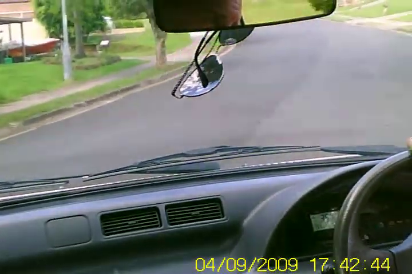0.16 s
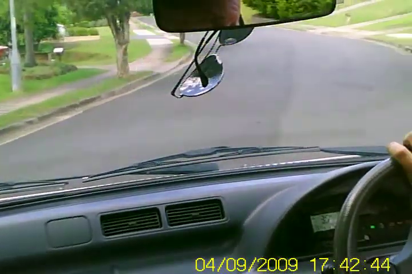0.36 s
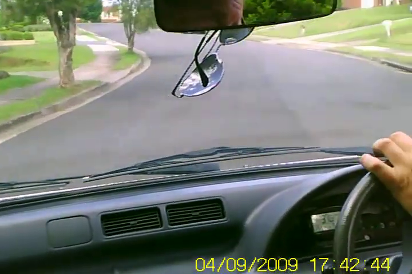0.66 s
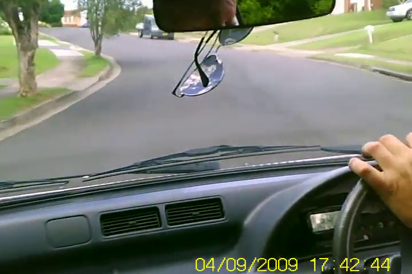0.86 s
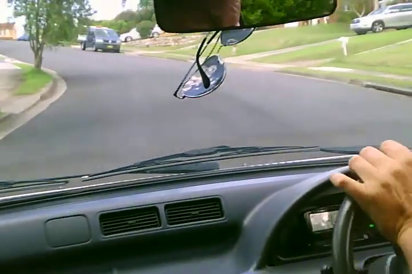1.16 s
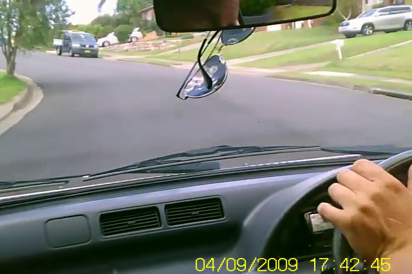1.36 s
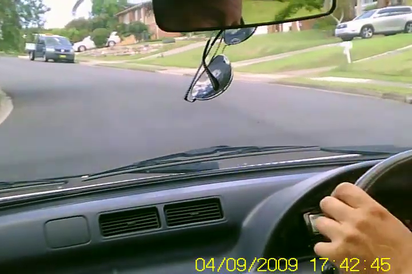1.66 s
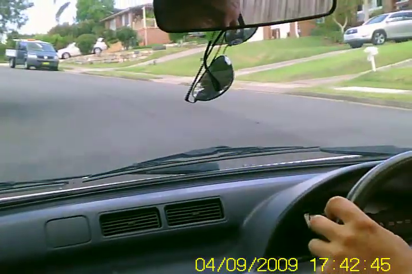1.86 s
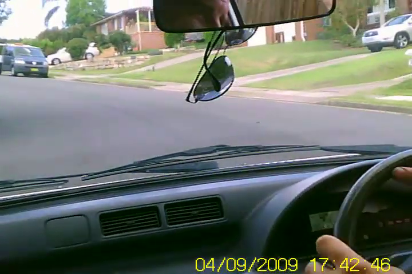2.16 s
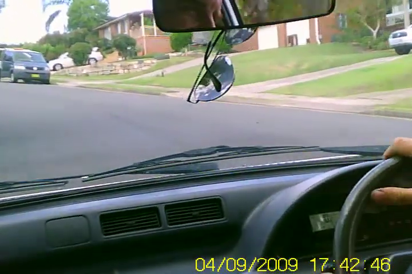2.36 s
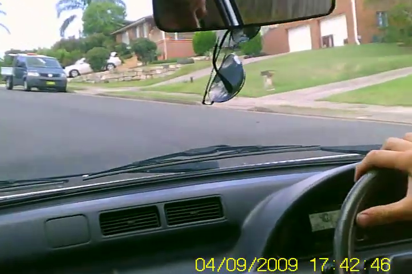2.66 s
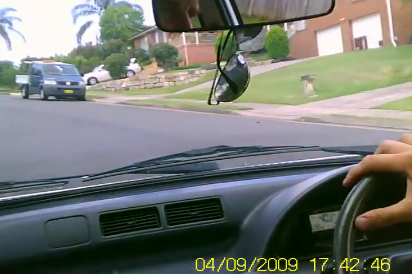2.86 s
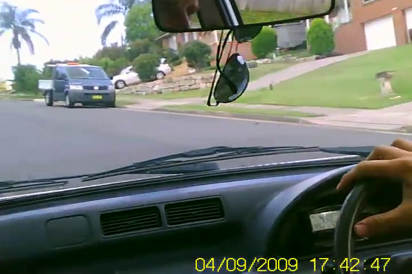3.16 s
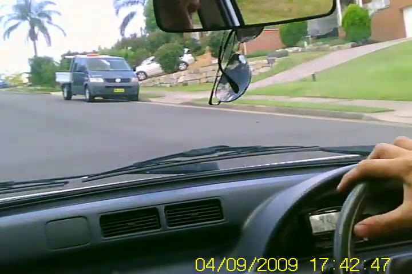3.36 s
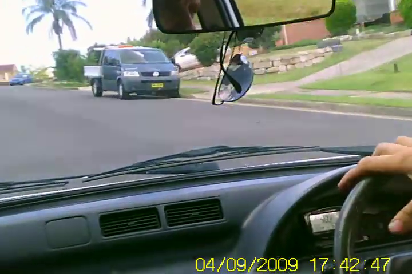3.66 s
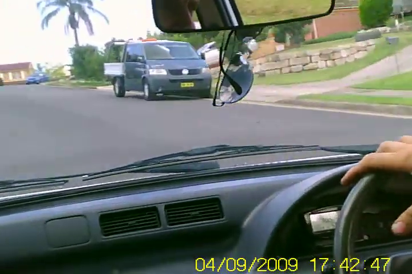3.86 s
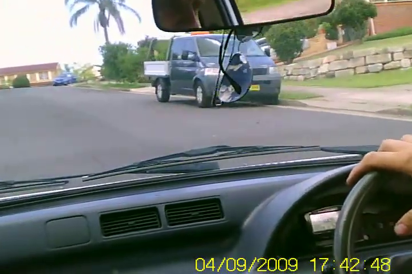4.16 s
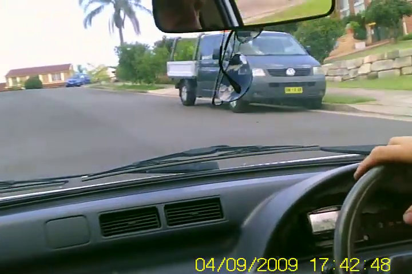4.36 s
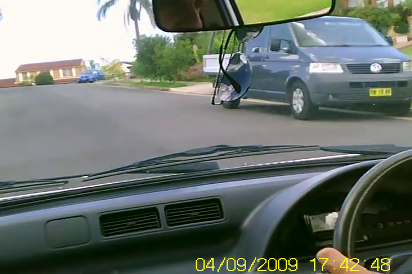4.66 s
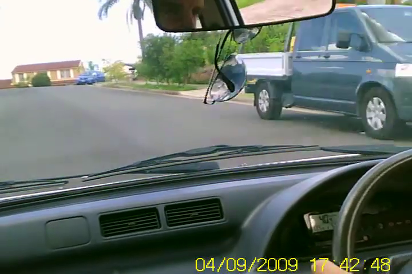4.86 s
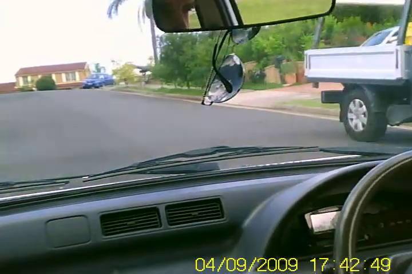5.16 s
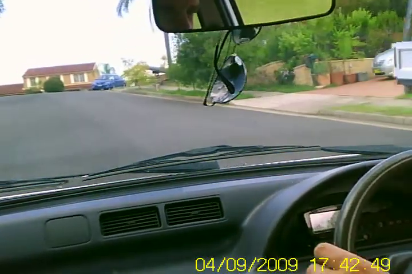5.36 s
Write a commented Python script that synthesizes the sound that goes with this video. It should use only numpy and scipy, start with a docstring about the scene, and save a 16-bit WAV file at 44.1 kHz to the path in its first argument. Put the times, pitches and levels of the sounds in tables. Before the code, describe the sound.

A small electric car's high motor whine over low road rumble, heard inside, with two soft thumps and one sharp click.

```python
"""Inside a small electric car rolling along a suburban street.
The motor whines near 1.2 kHz, modulated by the swaying driveline, and its brushes excite treble
resonances of the housing. The road forces the body, cabin air and panels into vibration over a faint
electronic hiss. A hand slides on the steering wheel, and the wheels thump over two seams.
Just after the first seam comes a sharp click, and the road noise and housing ring drop in level."""
import sys
import numpy as np
from scipy import signal
from scipy.fft import rfft, irfft
from scipy.io import wavfile
from scipy.ndimage import uniform_filter1d

SR = 44100
rng = np.random.default_rng(int(sys.argv[2]) if len(sys.argv) > 2 else 0)


def generate_wav(sig):
    """Save sig (samples, or channels by samples) to the path in sys.argv[1] as 16-bit PCM at SR."""
    pcm = np.round(np.clip(np.atleast_2d(sig).T, -1, 1) * 32767).astype(np.int16)
    wavfile.write(sys.argv[1], SR, pcm)


N = 242550
TIME = np.arange(N) / SR


def from_db(db):
    """Amplitude ratio: tenfold for every 20 dB."""
    return 10 ** (np.asarray(db) / 20)


def rms_one(x):
    """Normalisation to unit power."""
    return x / np.sqrt(np.mean(np.abs(x) ** 2) + 1e-20)


def in_time(curve):
    """Linear interpolation of (time, value) rows at every sample."""
    return np.interp(TIME, *np.transpose(curve))


def resonate(x, hz, width_hz):
    """Two equal resonators in cascade, scaled so that white noise keeps its power."""
    r = np.exp(-np.pi * width_hz / SR)
    section = [1 - r, 0, r - 1, 1, -2 * r * np.cos(2 * np.pi * hz / SR), r * r]
    return signal.sosfilt([section, section], x) * np.sqrt(2 * SR / (np.pi * width_hz))


def resonant_noise(hz, width_hz):
    """Steady-state response of a resonator to white noise; rms 1."""
    return rms_one(resonate(rng.standard_normal(N + SR // 2), hz, width_hz)[-N:])


def shaken(modes):
    """Superposition of randomly driven modes; rms 1."""
    return rms_one(sum(from_db(db) * resonant_noise(hz, width) for hz, width, db in modes))


def steadied(x, span_s):
    """Division by the running rms evens out slow swells and keeps fast ones."""
    return x / np.sqrt(uniform_filter1d(x * x, int(span_s * SR)) + 1e-6)


def coloured(spectrum):
    """Spectral shaping of white noise; rms 1."""
    hz, db = np.transpose(spectrum)
    bin_hz = np.arange(N // 2 + 1) * SR / N
    shape_db = np.interp(np.log(bin_hz + 1), np.log(hz), db)
    return rms_one(irfft(rfft(rng.standard_normal(N)) * from_db(shape_db), N))


def flutter(rate_hz, hop=50, run_in=1000):
    """Random modulation of amplitude and phase by complex low-pass noise; rms 1."""
    low_pass = signal.butter(2, rate_hz, fs=SR / hop, output="sos")
    noise = rng.standard_normal((2, N // hop + run_in + 2))
    real, imag = signal.sosfilt(low_pass, noise)[:, run_in:]
    return rms_one(np.interp(np.arange(N) / hop, np.arange(len(real)), real + 1j * imag))


def tone(phase, envelope=1):
    """A sinusoidal carrier of rms 1, modulated by a complex envelope."""
    return np.sqrt(2) * np.real(envelope * np.exp(1j * phase))


def partials(phase, orders):
    """Rotational orders: fluttering tones at fixed multiples of one frequency."""
    return sum(from_db(db) * tone(ratio * phase, flutter(rate_hz)) for ratio, db, rate_hz in orders)


def driveline_jolt(strength=.7, rise_s=.06, decay_s=.3):
    """Transient response: the driveline's swing builds and dies away after each seam."""
    ages = [np.maximum(TIME - start_s, 0) for start_s, _ in SEAMS]
    return strength * sum((1 - np.exp(-age / rise_s)) * np.exp(-age / decay_s) for age in ages)


# Motor load, heard as the strength of the whine: time_s, level_db
MOTOR_LOAD = [(0, -50), (.35, -51), (.55, -58), (.68, -54), (.9, -54.5), (.96, -64), (1.06, -58),
              (1.5, -52), (1.75, -53.5), (2.3, -56), (2.8, -52.5), (3.3, -50.5), (3.65, -51), (4.15, -48.5),
              (4.39, -48), (4.46, -58), (4.75, -53.5), (5.5, -52.5)]

def whine(pitch_hz, phase, taut_db=-47.5, sway_per_db=.06, upper_s_per_hz=.0031, trim_db=-.5):
    """Modulation makes side bands: the driveline sways under light load and after a jolt."""
    load_db = in_time(MOTOR_LOAD)
    jolt = driveline_jolt()
    sway_share = np.clip(sway_per_db * (taut_db - load_db) + jolt, 0, 1)
    sway = (resonant_noise(hz=13, width_hz=12) + 1j * resonant_noise(hz=13, width_hz=12)) / np.sqrt(2)
    main = tone(phase, np.sqrt(1 - sway_share) + np.sqrt(sway_share) * sway)
    # Speeding up or a jolt adds a once-a-turn wobble, moving power into the next shaft order up.
    climb_hz_per_s = np.maximum(np.gradient(pitch_hz, TIME), 0)
    upper_share = np.clip(upper_s_per_hz * climb_hz_per_s + .4 * jolt, 0, 1)
    shaft_phase = phase / 42
    upper = tone(phase + shaft_phase, flutter(rate_hz=12))
    both = np.sqrt(1 - upper_share) * main + np.sqrt(upper_share) * upper
    # The level wavers, more deeply near top speed.
    depth_db = np.interp(pitch_hz, [1208, 1222], [1.2, 3.2])
    waver = np.sqrt(2) * np.tanh(resonant_noise(hz=7.8, width_hz=5))
    return from_db(load_db + trim_db + depth_db * waver) * steadied(both, span_s=.1)


def hum(pitch_hz, phase, level_db=-56, panel_hz=566, width_hz=27.8):
    """A subharmonic, an octave under the whine, swells as it passes a panel resonance."""
    response = 1 / np.hypot(1, 2 * (pitch_hz / 2 - panel_hz) / width_hz)
    return from_db(level_db) * response * tone(phase / 2, 1 + .32 * flutter(rate_hz=3.8))


# Low orders of the motor shaft: whine_ratio, level_db, flutter_hz
SHAFT_ORDERS = [(5 / 21, -62, 4.4), (6 / 21, -68.5, 4.4), (7 / 21, -62, 5.8), (8 / 21, -59.5, 3),
                (9 / 21, -63, 4.4), (2, -80.5, 6.7)]

def growl(phase):
    """Forced vibration at multiples of the shaft's rotation rate."""
    return partials(phase, SHAFT_ORDERS)


# Strength of the brush noise: time_s, level_db
BRUSH_LEVEL = [(0, -72), (.9, -79), (1.25, -78.5), (1.55, -74.5), (1.85, -77), (2.85, -67), (3.4, -69.5),
               (4.3, -72.5), (5.5, -70.5)]
# Overtones of the brushes: whine_ratio, gain_db, flutter_hz
BRUSH_OVERTONES = [(125 / 42, 0.91, 12), (3, 3.4, 12), (3.3, 0, 25), (4, 6.2, 35), (173 / 42, -3, 46),
                   (182 / 42, -7.5, 25), (195 / 42, -5, 30)]
# Modes of the motor housing: centre_hz, width_hz, gain_db
HOUSING_MODES = [(3598, 130, -7), (4100, 99, -10), (4932, 270, -2.5), (5053, 87, 0), (5310, 400, -3.5),
                 (5580, 150, -7), (6030, 460, -13.5)]

def brushes(phase, overtone_trim_db=-1, ring_db=-70.5, ring_follows=.4):
    """Resonance: brush noise rings the housing, and each overtone sings as it crosses a mode."""
    overtones = partials(phase, BRUSH_OVERTONES)
    singing = rms_one(sum(from_db(db) * resonate(overtones, hz, width) for hz, width, db in HOUSING_MODES))
    brush_db = in_time(BRUSH_LEVEL)
    swing_db = ring_follows * (brush_db - brush_db.mean())
    ring = from_db(ring_db + swing_db) * early_boost() * shaken(HOUSING_MODES)
    return ring + from_db(brush_db + overtone_trim_db) * singing


# Motor speed, heard as the pitch of the whine: time_s, pitch_hz
MOTOR_SPEED = [(0, 1105), (.5, 1152), (.7, 1178), (1, 1189), (2.35, 1227), (3, 1221), (3.5, 1213),
               (4.38, 1206), (4.52, 1168), (4.9, 1168), (5.5, 1143)]

def motor():
    """One rotation drives every motor tone; phase is the integral of frequency."""
    pitch_hz = in_time(MOTOR_SPEED)
    phase = 2 * np.pi * np.cumsum(pitch_hz) / SR
    return hum(pitch_hz, phase) + growl(phase) + brushes(phase) + whine(pitch_hz, phase)


# Unevenness of the road, felt as body shake: time_s, level_db
UNEVENNESS = [(0, -21.5), (.5, -18), (.7, -20.5), (.87, -14), (1.02, -25), (1.45, -26.5), (1.8, -32),
              (2.1, -21.5), (2.42, -31), (2.9, -23), (3.08, -21), (3.5, -24.5), (4.3, -24), (4.6, -19.5),
              (5, -23.5), (5.5, -24.5)]
# Spectrum of the sprung body's rocking: frequency_hz, relative_density_db
BODY_SPECTRUM = [(6, -25), (12, -14), (17, -2), (22, 0.5), (27, 2), (33, -7.5), (48, -9.5), (55, -19),
                 (64, -25.5), (90, -100)]

def body_rumble(trim_db=-1.43):
    """Base excitation: the uneven road rocks the body on its springs."""
    return from_db(in_time(UNEVENNESS) + trim_db) * steadied(coloured(BODY_SPECTRUM), span_s=.161)


# Coarseness of the asphalt: time_s, gain_db
COARSENESS = [(0, -0.5), (.6, -0.5), (.8, 1), (1, -2), (1.88, -1.5), (2.1, -0.6), (2.4, -1), (2.9, 1.4),
              (3.5, 1), (4.4, 1.5), (5, 0), (5.5, 0)]
# Modes of the cabin air: centre_hz, width_hz, gain_db
CABIN_MODES = [(74.2, 15.7, 1.5), (102.4, 17, -2), (129.2, 34.7, 3), (159.7, 56, -4), (227.7, 50, -6.5)]
# Modes of the panels: centre_hz, width_hz, gain_db
PANEL_MODES = [(313.7, 72, -1.5), (337, 44, -8.5), (411.5, 42, 3), (469.7, 68, -3.5), (522.7, 51, 0.5),
               (576, 160, -4.5)]
# Tyre noise through the glass: frequency_hz, relative_density_db
TYRE_SPECTRUM = [(200, 7), (600, 2.5), (705, -1), (760, 7), (810, 5.5), (930, 6.5), (1020, 9), (1130, 2.5),
                 (1290, 1), (1650, -1.5), (1950, 0.5), (2500, -6.5), (3200, -13), (7000, -23.5)]

def road_noise(cabin_db=-42, panel_db=-52, tyre_db=-54.5, cabin_follows=1.38):
    """Random excitation: rough asphalt drives cabin air and panel modes while the tread hisses."""
    coarse_db = in_time(COARSENESS)
    drone = from_db(cabin_db + cabin_follows * coarse_db) * steadied(shaken(CABIN_MODES), span_s=.2)
    roar = from_db(panel_db + coarse_db) * steadied(shaken(PANEL_MODES), span_s=.23)
    tread = from_db(tyre_db + coarse_db) * coloured(TYRE_SPECTRUM)
    return early_boost() * (drone + roar + tread)


# Electronic hiss: frequency_hz, relative_density_db
HISS_SPECTRUM = [(1000, 5.5), (6000, 4.5), (9600, 2.5), (11400, -4)]
# Steady tones of the electronics: pitch_hz, level_db
ELECTRONIC_TONES = [(3894, -85.5), (5600, -84.5), (6200, -94), (7400, -85), (9600, -87)]

def electronics(hiss_db=-72):
    """A line spectrum of thin tones over a continuous spectrum of hiss."""
    tones = sum(from_db(db) * tone(2 * np.pi * hz * TIME) for hz, db in ELECTRONIC_TONES)
    return from_db(hiss_db) * coloured(HISS_SPECTRUM) + tones


# Strokes of a hand on the wheel and trim: start_s, length_s, level_db, centre_hz, width_hz
HAND_STROKES = [(0.412, .05, -59, 3000, 2200), (0.535, 0.04, -54, 1870, 500),
                (1.135, 0.02, -68, 3500, 5000), (1.135, 0.02, -65, 6160, 1200),
                (1.137, 0.12, -54.5, 1290, 1500), (1.16, 0.023, -63, 3600, 3800),
                (1.161, 0.049, -65, 6030, 895), (1.163, 0.071, -59.5, 2610, 1580),
                (1.387, 0.043, -66, 1980, 600), (4.41, 0.03, -56.5, 2180, 500)]

def hand_rubs():
    """Sliding friction: each stroke is a band of noise that swells quickly and fades."""
    out = np.zeros(N)
    for start_s, length_s, db, hz, width_hz in HAND_STROKES:
        progress = np.clip((TIME - start_s) / length_s, 0, 1)
        out += from_db(db) * np.sin(np.pi * np.sqrt(progress)) * resonant_noise(hz, width_hz)
    return out


# Wheels striking road seams: start_s, level_db
SEAMS = [(0.734, -24), (4.396, -23.5)]
# Modes of the suspension: pitch_hz, gain_db, t60_s
SUSPENSION_MODES = [(139, 3.5, 0.089), (185, -36, 0.025), (243, 1.5, 0.016), (325, -19, 0.019)]

def seam_thumps(tyre_cutoff_hz=420):
    """Damped free vibration: each seam kicks the suspension, and the soft tyre low-passes the blow."""
    out = np.zeros(N)
    for start_s, level_db in SEAMS:
        age = np.maximum(TIME - start_s, 0)
        for hz, gain_db, t60_s in SUSPENSION_MODES:
            decay_db = 60 * np.minimum(age / t60_s, 3)
            out -= from_db(level_db + gain_db - decay_db) * np.sin(2 * np.pi * hz * age)
    return signal.sosfilt(signal.butter(2, tyre_cutoff_hz, fs=SR, output="sos"), out)


CLICK_S = .916

def click(level_db=-22.5, decay_s=.0056):
    """Switching transient: one sharp click as the gain steps down, a signal step that decays quickly."""
    decay = np.exp(-np.clip((TIME - CLICK_S) / decay_s, 0, 20))
    return -from_db(level_db) * (TIME >= CLICK_S) * decay


def early_boost(boost_db=4.5):
    """A step in gain: louder until the click, unity afterwards."""
    return from_db(boost_db * (TIME < CLICK_S))


def scene():
    """Superposition of all sources at the passenger seat, in one channel."""
    rolling = motor() + body_rumble() + road_noise()
    events = hand_rubs() + seam_thumps() + click()
    return (rolling + events + electronics())[None]


def record(dry, rolloff_hz=10400, cutoff_hz=11700, dc_offset=-.0286):
    """Band limiting: the top rolls off and is cut; the signal rests slightly below zero."""
    rolloff = signal.butter(8, rolloff_hz, fs=SR, output="sos")
    steep_cut = signal.ellip(10, .1, 90, cutoff_hz, fs=SR, output="sos")
    return signal.sosfilt(steep_cut, signal.sosfilt(rolloff, dry)) + dc_offset


dry = scene()
out = record(dry)
generate_wav(out)
```